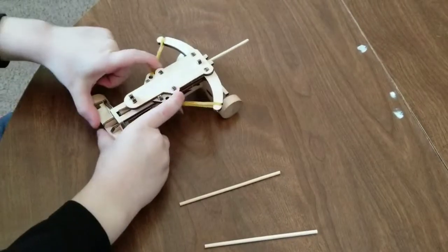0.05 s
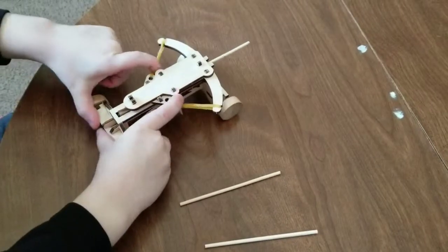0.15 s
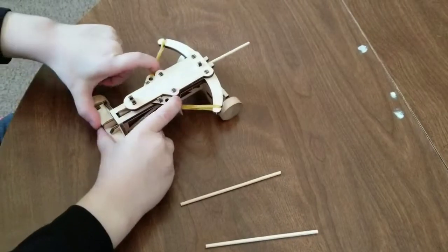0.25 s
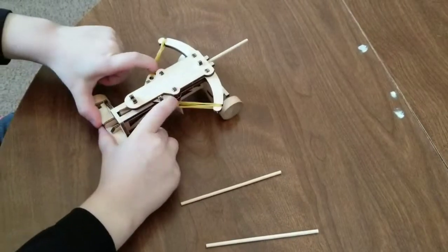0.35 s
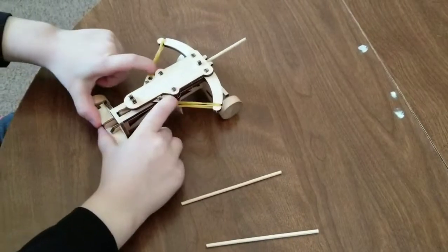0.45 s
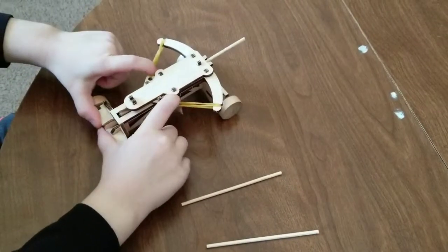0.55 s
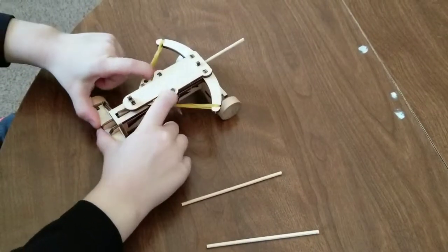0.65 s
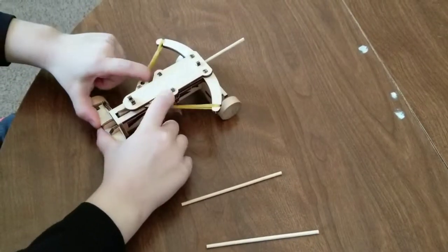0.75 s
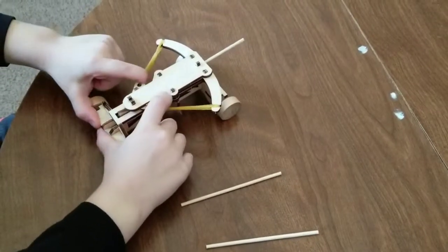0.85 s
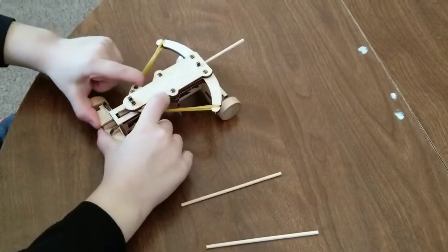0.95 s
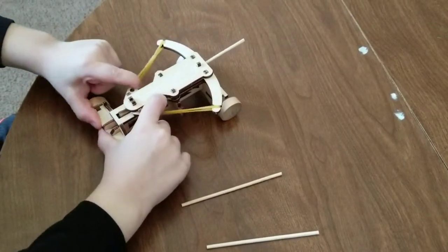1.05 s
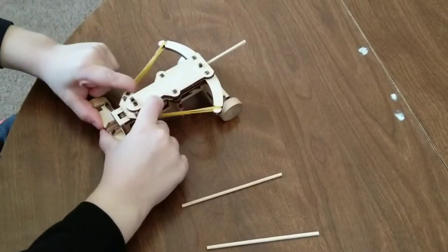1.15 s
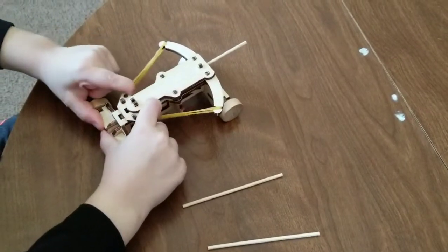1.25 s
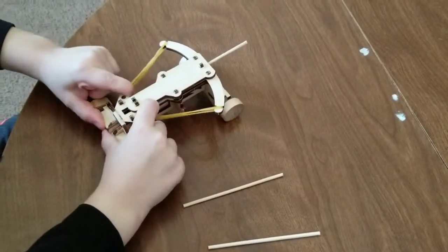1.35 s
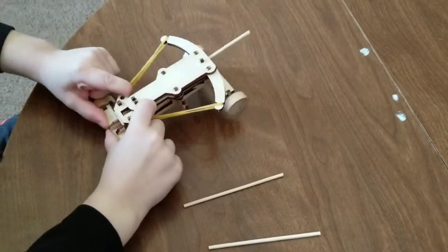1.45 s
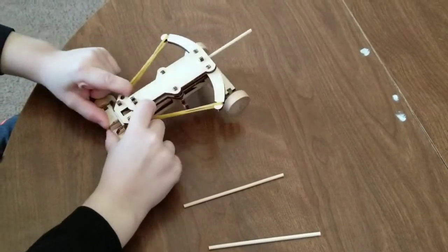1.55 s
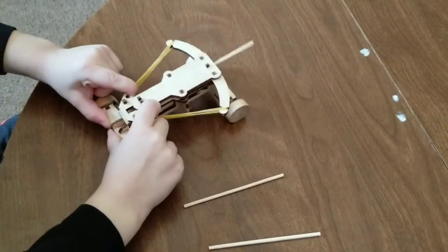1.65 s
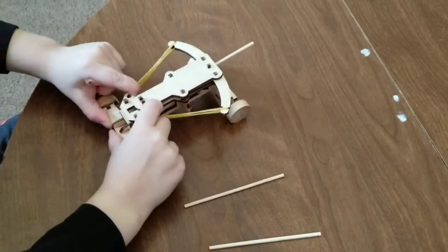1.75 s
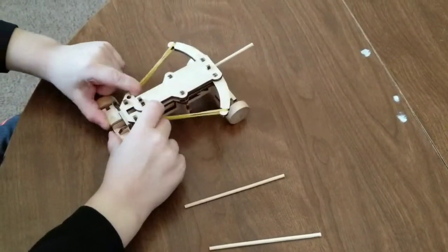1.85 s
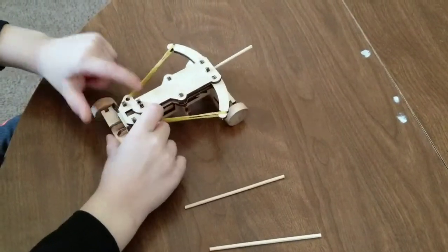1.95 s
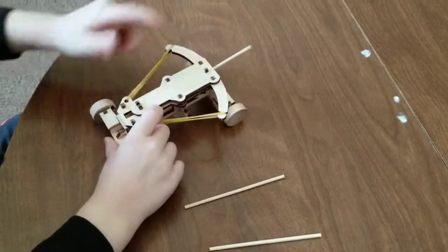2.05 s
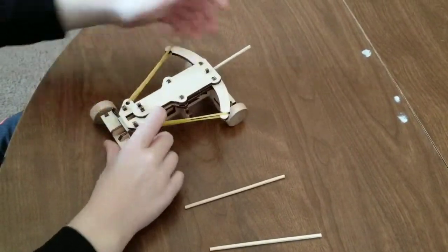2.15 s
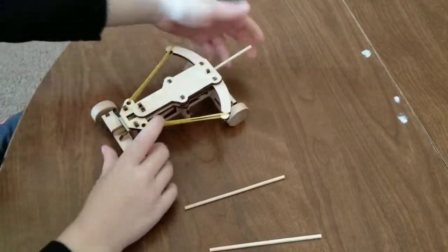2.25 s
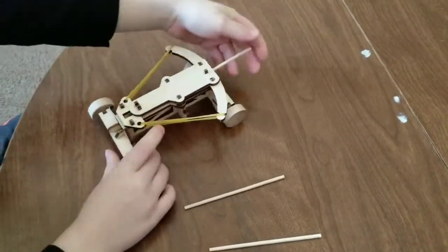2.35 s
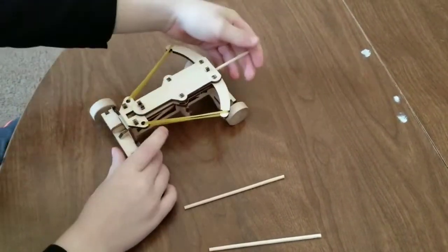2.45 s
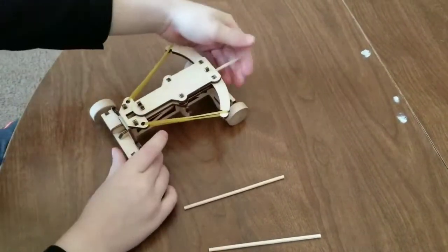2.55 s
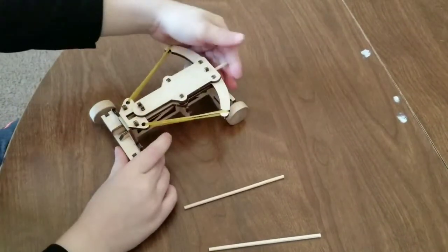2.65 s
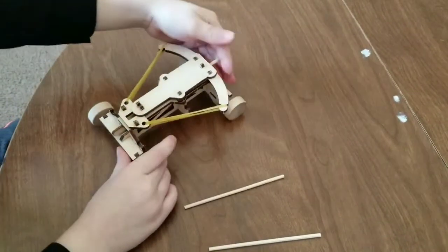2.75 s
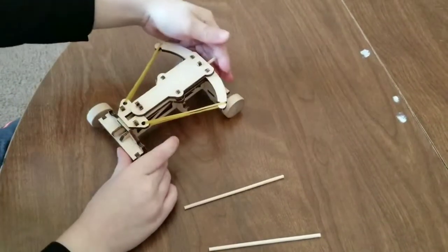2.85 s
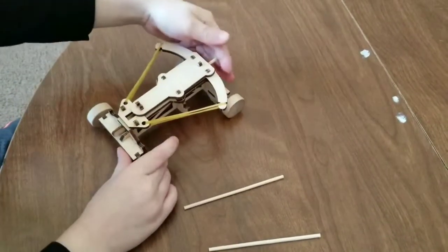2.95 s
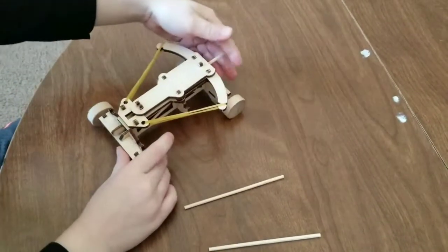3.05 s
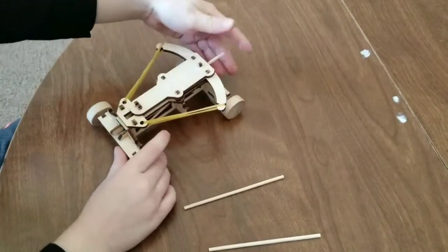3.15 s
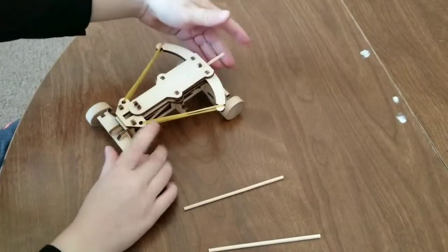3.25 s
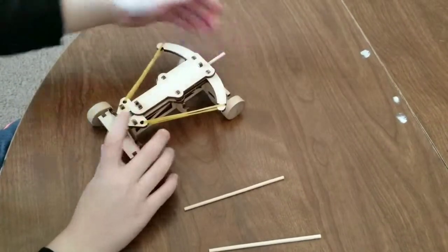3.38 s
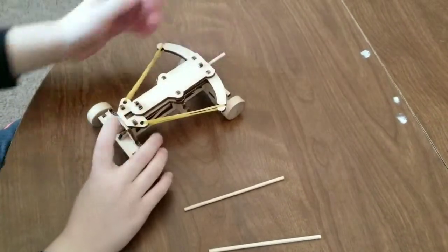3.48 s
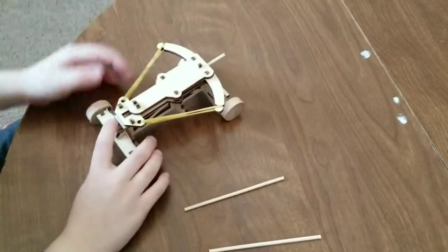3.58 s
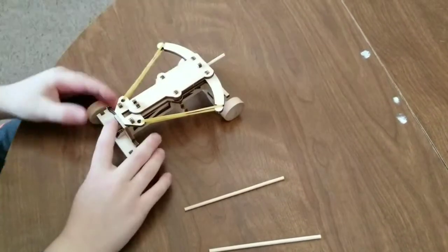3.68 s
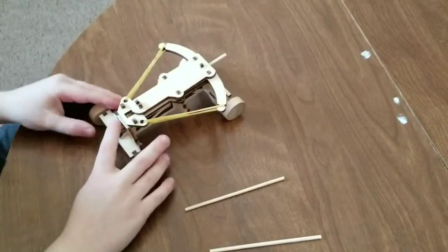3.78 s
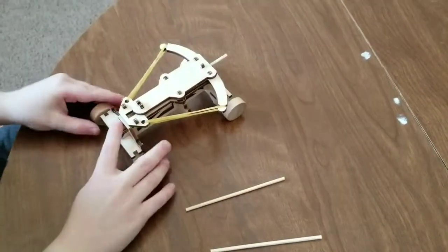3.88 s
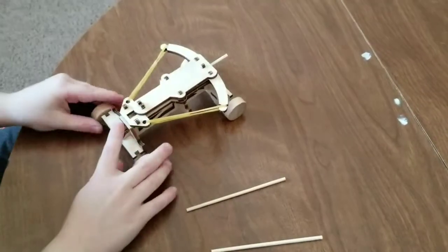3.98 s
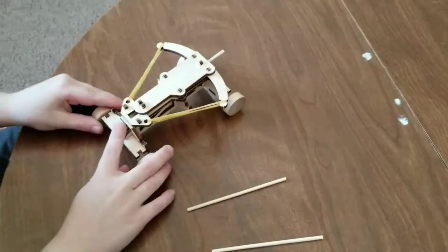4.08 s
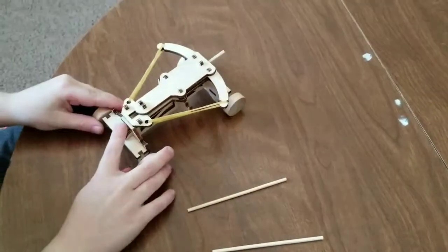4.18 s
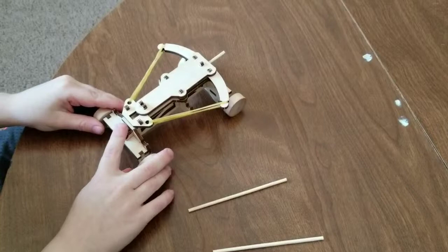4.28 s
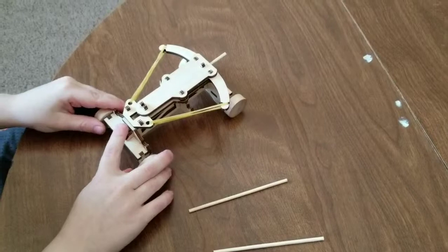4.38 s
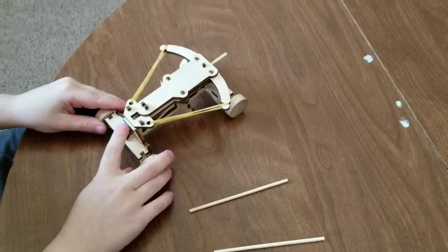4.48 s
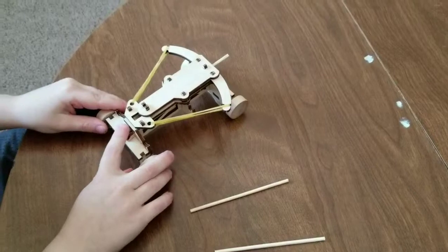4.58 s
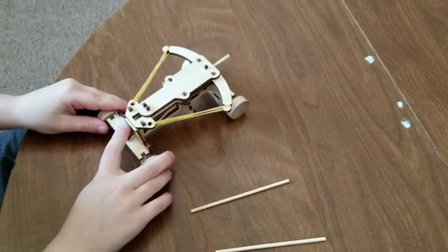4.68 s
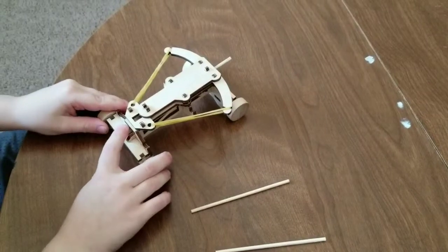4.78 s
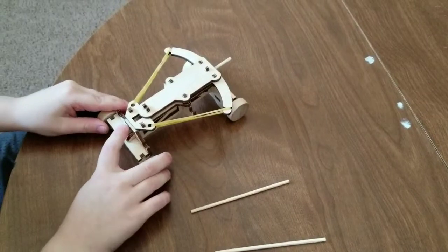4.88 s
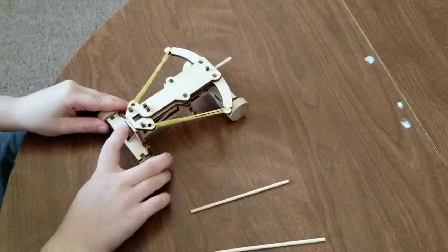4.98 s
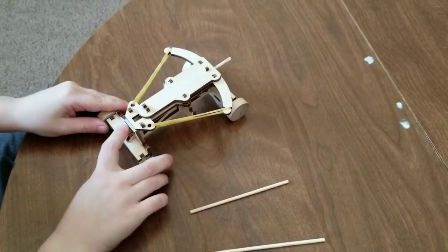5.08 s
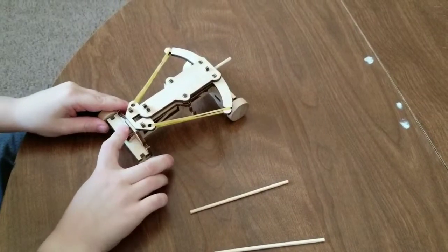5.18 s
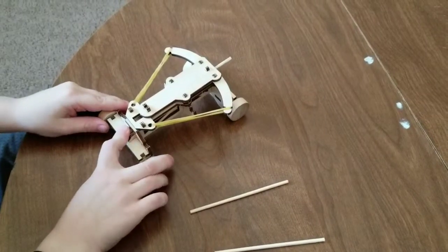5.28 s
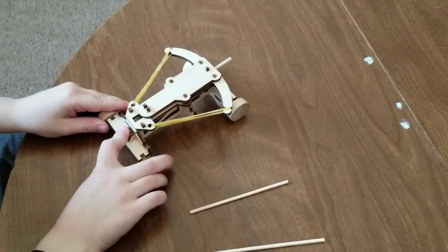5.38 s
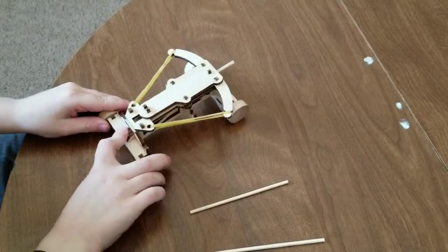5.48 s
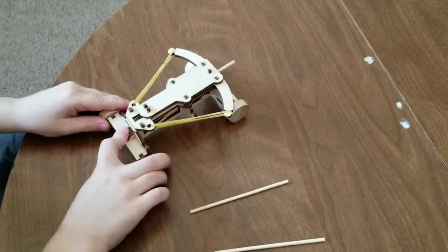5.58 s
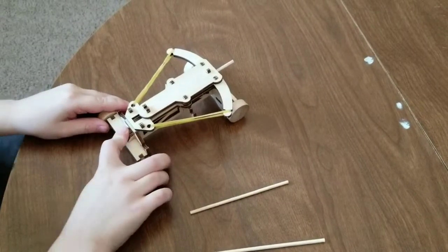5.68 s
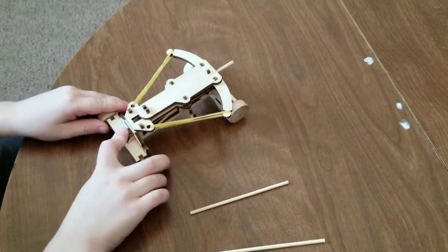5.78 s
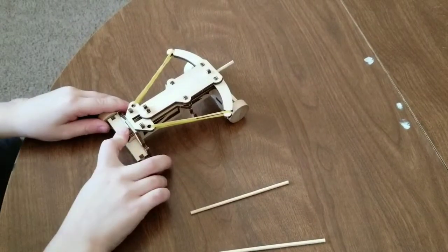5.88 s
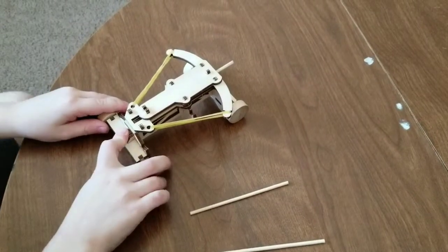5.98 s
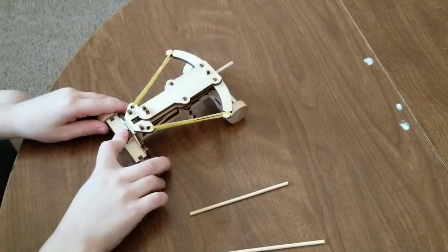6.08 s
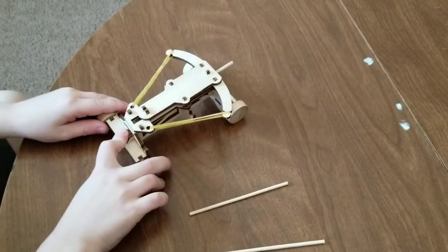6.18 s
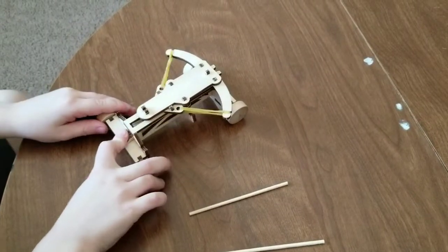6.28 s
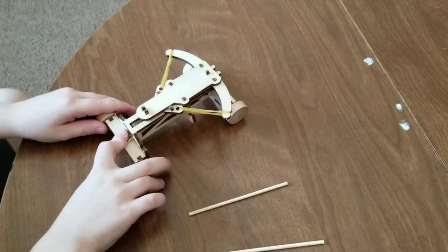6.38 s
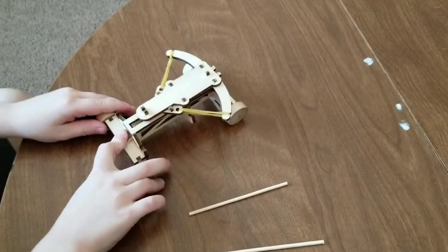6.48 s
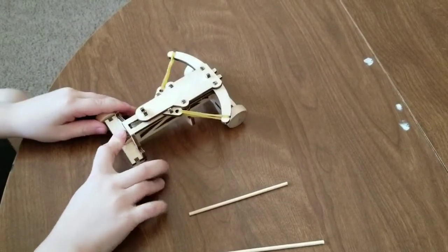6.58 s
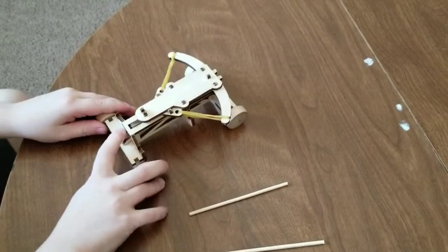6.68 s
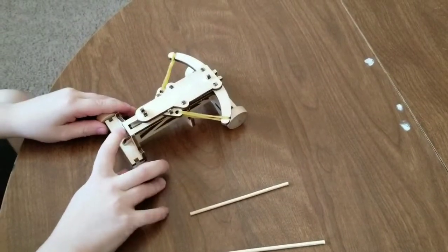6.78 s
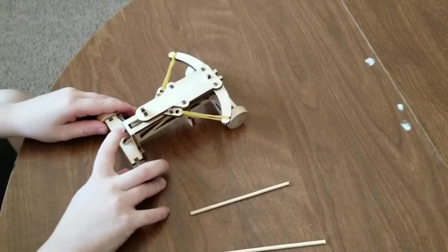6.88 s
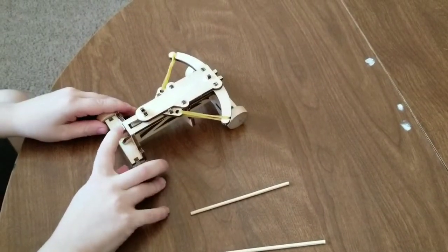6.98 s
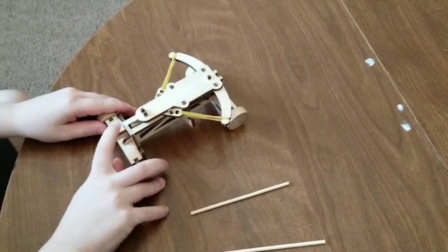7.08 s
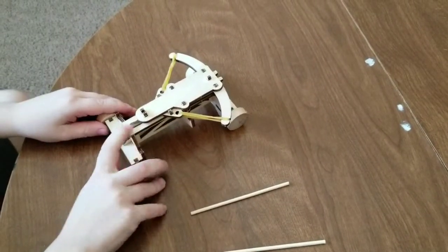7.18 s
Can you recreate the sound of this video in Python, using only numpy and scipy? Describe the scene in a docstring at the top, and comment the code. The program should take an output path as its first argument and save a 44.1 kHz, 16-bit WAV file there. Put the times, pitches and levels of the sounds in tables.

```python
"""Over a mains hum and low rumble in a quiet room, hands rub and click the parts of a small plywood catapult.
Its slider is drawn along the rail; a latch snaps and chatters on the taut band, and another snap follows.
Fainter clicks and scrapes of loading go on until the shot: the released slider rattles and puffs air.
Contacts and rubs ring damped wood modes, slides and rattle are coloured grains, the puff is a decaying tone.
The recorder turns its gain down after each loud snap; source levels stand ahead of that gain control."""
import sys
import numpy as np
from scipy import signal
from scipy.fft import rfft, irfft
from scipy.io import wavfile

SR = 44100
rng = np.random.default_rng(int(sys.argv[2]) if len(sys.argv) > 2 else 0)


def dump_mix(stems):
    """Bounce the given channels to the path in sys.argv[1] as a 16-bit WAV at rate SR."""
    frames = np.atleast_2d(stems).T  # one column per channel
    limited = np.clip(frames, -1, 1)  # hard clip at full scale
    pcm = np.round(limited * 32767).astype(np.int16)
    wavfile.write(sys.argv[1], SR, pcm)


N = 319284      # samples


def from_db(db):
    """Level is logarithmic: decibels to amplitude gain."""
    return 10 ** (np.asarray(db, float) / 20)


def rms_one(x):
    """Effective value: scale a signal to rms 1."""
    return x / np.sqrt(np.mean(x ** 2) + 1e-20)


def in_time(rows):
    """Envelope: interpolate the columns of a time table linearly, sample by sample."""
    s, *columns = np.transpose(rows)
    return [np.interp(np.arange(N) / SR, s, c) for c in columns]


def at_hz(points, hz):
    """Frequency response: read a table on a logarithmic frequency axis."""
    table_hz, values = np.transpose(points)
    return np.interp(np.log(np.maximum(hz, 1)), np.log(table_hz), values)


def coloured(x, spectrum):
    """Linear filtering: give white input a spectrum, then rms 1."""
    hz = np.fft.rfftfreq(x.shape[-1], 1 / SR)
    shaped = rfft(x) * from_db(at_hz(spectrum, hz))
    return rms_one(irfft(shaped, x.shape[-1]))


def stereo_noise(alike):
    """Partial coherence: two white noises whose correlation is alike."""
    mid, side = rng.standard_normal((2, N))
    alike = np.clip(alike, 0, 1)
    return np.sqrt(1 + alike) * mid + np.sqrt(1 - alike) * side * [[1], [-1]]


def grains(per_s, spread_db):
    """Shot noise: tiny random impacts of uneven size, heard differently on each side."""
    sizes = from_db(spread_db * np.minimum(rng.exponential(1, N), 4))
    struck = rng.random(N) < per_s / SR
    return sizes * struck * stereo_noise(alike=0.45)


def drift(rate):
    """Slow random modulation: straight lines between normal chance values, rate of them per second."""
    knots = np.arange(-2, N / SR * rate + 2)
    values = rng.standard_normal(4000)[:len(knots)]
    return np.interp(np.arange(N) / SR * rate, knots, values)


def rung(bright_hz, below_db, above_db, focus_db, damping, scatter_db):
    """Modal impulse response: decaying sines, weighted towards the brightest pitch, differ at each microphone."""
    # modes of the plywood frame on the table top: f/Hz, level/dB, t60/s at damping 1
    wood_modes = [(290, -1, 0.037), (324, 1, 0.04), (440, -5.5, 0.062), (620, -3.5, 0.035),
                  (770, -0.5, 0.02), (872, -1.5, 0.027), (980, -2.5, 0.013), (1290, -0.5, 0.024),
                  (1640, 0, 0.021), (1900, -1, 0.019), (2200, -4.5, 0.022), (2600, 1.5, 0.021),
                  (2990, -0.5, .02), (3490, 0.5, 0.022), (3910, 1.5, .02), (4370, -0.5, 0.047),
                  (4920, 1, 0.026), (5300, 0, 0.023), (5850, 1, 0.022), (6440, 6, 0.021),
                  (7362, -1.5, 0.013), (8200, -8, 0.0092), (9600, -14, 0.0088), (10300, -6.5, 0.011),
                  (11100, -4.5, .008), (12600, -8, 0.038), (13900, -8.5, 0.021)]
    t = np.arange(round(.15 * SR)) / SR
    hz, level_db, t60 = np.transpose(wood_modes)[:, :, None]
    chance = rng.standard_normal((5, len(wood_modes), 1))
    # weights fall by focus_db per octave, down to a shelf on either side
    shelf_db = np.where(hz < bright_hz, below_db, above_db)
    weight_db = np.maximum(-focus_db * np.abs(np.log2(hz / bright_hz)), shelf_db)
    sign = (-1) ** np.arange(len(wood_modes))[:, None]
    strength = sign * from_db(level_db + weight_db + scatter_db * chance[:2])
    hz = hz * (1 + .01 * scatter_db * chance[2])      # chance detunes each mode slightly at every contact
    # each mode radiates from another spot
    since = np.maximum(t - .00005 * scatter_db * np.abs(chance[3:]), 0)
    decay = from_db(-60 * since * damping / t60)
    return np.sum(strength * np.sin(2 * np.pi * hz * since) * decay, axis=1)


def add(out, s, sound):
    """Superposition: mix a sound in from time s."""
    i = round(s * SR)
    out[:, i:i + sound.shape[1]] += sound[:, :N - i]


def hum():
    """Mains hum at twice the line pitch with weak harmonics, wavering a little, over a low noise rumble."""
    # harmonics: f/Hz, mean level/dB rms
    harmonics = [(120, -47.5), (240, -73), (360, -79)]
    # relative spectrum of the rumble: f/Hz, density/dB
    rumble_colour = [(20, -12), (45, -11), (75, -0.5), (100, -2), (150, 1.5), (200, -6), (280, -9.5),
                     (400, -19), (650, -33), (1200, -48.5)]
    rumble_db = -60.5
    turn = 2 * np.pi * np.arange(N) / SR
    tone = 0
    for hz, db in harmonics:
        level = np.sqrt(2) * from_db(db + .7 * drift(5))
        tone = tone + level * np.sin(hz * turn + rng.uniform(0, 2 * np.pi))
    rumble = from_db(rumble_db + 2.8 * drift(14)) * coloured(stereo_noise(alike=.8), rumble_colour)
    return tone * from_db([[.3], [-.3]]) + rumble


def room(x):
    """Diffuse reverberation: each octave of noise dies at its own rate, independently on each side."""
    # decay time: f/Hz, t60/s
    decay_times = [(200, 0.45), (1000, 0.3), (3000, .33), (7000, .28), (14000, 0.2)]
    room_db, gap_s = -6, 0.0049      # tail level; time in which the echoes build up
    t = np.arange(round(.6 * SR)) / SR
    tail = 0
    for low in 100 * 2.0 ** np.arange(7.5):
        sos = signal.butter(2, [low, min(2 * low, 19000)], "band", fs=SR, output="sos")
        noise = signal.sosfilt(sos, rng.standard_normal((2, len(t))))
        tail = tail + noise * from_db(-60 * t / at_hz(decay_times, low * np.sqrt(2)))
    tail = tail * (1 - np.exp(-(t / gap_s) ** 2))
    tail = tail / np.sqrt(np.sum(tail ** 2, axis=1, keepdims=True))
    mono = x.mean(axis=0, keepdims=True)
    return from_db(room_db) * signal.fftconvolve(mono, tail, axes=1)[:, :N]


def pulls():
    """Amplitude envelope: each pull swells in, drifts from its first to its last level and fades."""
    # the slider on its rail in short pulls: t/s, length/s, first level/dB, last level/dB
    draws = [(0.831, .12, -59.5, -61), (.95, .335, -72.5, -63), (1.35, .11, -54.5, -63.5),
             (1.5, .155, -68, -64)]
    attack_s, release_s = .025, .025
    s, gain = np.arange(N) / SR, 0
    for start, length, first_db, last_db in draws:
        end = start + length
        edges = np.clip(np.minimum((s - start) / attack_s, 1 + (end - s) / release_s), 0, 1)
        level_db = np.interp(s, [start, end], [first_db, last_db])
        gain = np.maximum(gain, edges * from_db(level_db))
    return gain


def rubbing():
    """Stick-slip friction: dense grains ring the wood while a part drags; the slider hisses."""
    # parts dragged over each other or the table: t/s, length/s, level/dB,
    # brightest pitch f/Hz, lowest weight of the modes above it/dB
    scrapes = [(0.174, 0.12, -66, 1290, -12), (0.276, 0.067, -59.5, 1640, -11),
               (0.511, 0.091, -69.5, 1900, -9), (0.527, 0.077, -59.5, 353, -31),
               (0.69, 0.056, -75, 2600, -10), (1.277, 0.045, -68, 1640, -22),
               (1.347, 0.054, -58, 1290, -30), (1.595, 0.046, -61.5, 620, -17),
               (1.666, 0.05, -29.5, 10300, 6), (1.906, 0.051, -25.5, 2990, -21),
               (2.299, 0.078, -74.5, 980, -28.5), (2.354, 0.078, -69, 5040, -7.5),
               (2.52, 0.13, -55, 770, -22), (2.602, 0.05, -56, 1290, -19), (2.683, 0.079, -64, 6480, -13.5),
               (2.798, 0.064, -64, 4800, -1), (2.865, 0.052, -55.5, 2600, -16),
               (2.942, 0.12, -57.5, 1290, -18.5), (3.192, 0.065, -75, 980, -20),
               (3.3, 0.12, -76.5, 6370, -5.5), (3.766, 0.12, -66.5, 770, -20.5),
               (3.797, 0.075, -70.5, 1630, -28), (3.866, 0.064, -74.5, 5840, -0.5),
               (3.926, 0.096, -70, 980, -14.5), (4.104, 0.042, -74, 3990, -4.5),
               (4.221, 0.1, -63, 1290, -17.5), (4.277, 0.083, -68, 990, -25), (4.98, .05, -75.5, 620, -10),
               (5.374, 0.049, -71.5, 1290, -8), (5.673, 0.094, -60, 980, -22),
               (6.257, 0.023, -63, 440, -26.5), (6.268, 0.18, -76, 2200, -3), (6.659, 0.073, -54, 874, -30),
               (6.966, 0.036, -51, 290, -35)]
    # relative spectrum of the sliding hiss: f/Hz, density/dB
    slide_colour = [(1180, -49.5), (2000, -22), (2790, -16.5), (3940, -0.5), (6090, -2), (8080, -13),
                    (8730, -18.5), (13900, -9), (14900, -20.5), (15200, -71)]
    hard_db = -42      # louder scrapes are slams
    # lowest weight of modes under the brightest pitch: a rub at 1000 Hz, its loss per octave up; a slam
    rub_bass_db, rub_bass_loss_db, slam_bass_db = -9, 6, -4
    out, slips = np.zeros((2, N)), grains(6800, spread_db=4.5) * from_db(2.6 * drift(60))
    for s, length, db, hz, above_db in scrapes:
        t = np.arange(round(length * SR)) / SR
        stroke = np.clip(np.minimum(t / (0.09 * length), (length - t) / .025), 0, 1)
        force = slips[:, round(s * SR):][:, :len(t)] * stroke
        if db > hard_db:      # parts slammed together damp each other and ring broader
            pressed, below_db = 2.5, slam_bass_db
        else:
            pressed, below_db = 1.4, rub_bass_db - rub_bass_loss_db * np.log2(hz / 1000)
        wood = rung(hz, below_db, above_db, focus_db=14.5, damping=0.76 * pressed, scatter_db=2.2)
        wood = wood / np.sqrt(np.sum(wood ** 2) / 2)
        add(out, s, from_db(db) * signal.fftconvolve(rms_one(force), wood, axes=1))
    hiss = coloured(grains(12000, spread_db=-0.5), slide_colour)
    return out + pulls() * hiss * from_db(2.3 * drift(52))


def blow(peak_db, bright_hz, below_db, above_db, pan_db, focus_db, rough_s, damping, scatter_db):
    """Impact excitation: a sharp push and a short rough crackle drive damped wood."""
    t = np.arange(400) / SR
    force = .5 * rng.standard_normal((1, len(t))) * np.exp(-t / rough_s)
    force[0, 0] = 1
    wood = rung(bright_hz, below_db, above_db, focus_db, damping, scatter_db)
    sound = signal.fftconvolve(wood, force, axes=1)
    # small parts radiate little bass
    sound = signal.sosfilt(signal.butter(2, 614, "high", fs=SR, output="sos"), sound)
    sound = sound / np.abs(sound).max(axis=1, keepdims=True)
    return sound * from_db(peak_db + np.array([[.5], [-.5]]) * pan_db)


def clicks():
    """Impact: single contacts of wood on wood."""
    # t/s, peak level (mean of both sides)/dB, brightest pitch f/Hz,
    # lowest weight of the modes above it/dB, left minus right level/dB
    contacts = [(0.284, -39, 1640, -18, -9.5), (0.522, -53, 2040, -7, 1), (0.544, -45.5, 2040, -1, 2),
                (0.607, -50, 4400, -25, -11), (0.695, -46, 4070, -3, -6), (1.288, -51, 4430, -18, 1),
                (1.351, -30, 5740, -8, -9), (1.38, -36.5, 3840, -11, -5), (1.661, -4, 4030, -1, -4.5),
                (1.905, -1, 4420, -12.5, -8), (1.908, -4.5, 2990, -28, 2.5), (2.597, -43, 2200, -24, 4),
                (2.616, -38, 990, -20.5, 5), (2.867, -26.5, 6490, -23, -9), (2.884, -35.5, 3170, -16.5, -4),
                (2.965, -38.5, 1238, -21.5, 0.5), (4.219, -51, 1295, -22.5, 4),
                (5.379, -56, 4050, -17.5, -3), (5.678, -51.5, 1360, -17, -3.5),
                (5.723, -49.5, 1290, -18, -4.5), (6.464, -15.5, 6170, -16, 1), (6.468, -4, 12600, -8, -3.5),
                (6.479, -15, 12400, -18, -14), (6.499, -5, 2500, -8.5, -12)]
    out = np.zeros((2, N))
    for s, peak_db, hz, above_db, pan_db in contacts:
        add(out, s, blow(peak_db, hz, -19, above_db, pan_db,
                         focus_db=17.5, rough_s=0.001, damping=2.0, scatter_db=3.5))
    return out


def chatter():
    """Repeated impact: the latch bounces at the pitch of the band, ever softer and duller.

    Two close modes beat in each touch."""
    # start t/s, touches per second, settled peak level/dB, fall per touch/dB,
    # extra level at first/dB, brightest pitch f/Hz
    bounces = (1.6703, 84.9, -15, 2.2, 5, 3690)
    out = np.zeros((2, N))
    start, per_s, settled_db, fall_db, extra_db, hz = bounces
    for k in range(18):
        peak_db = settled_db - k * fall_db + extra_db * np.exp(-k / 2)
        touch = blow(peak_db, hz, -26, -14 - 4 * k, -3,
                     focus_db=60, rough_s=.0001, damping=1.2, scatter_db=.4)
        add(out, start + k / per_s, touch)
    return out


def shot():
    """Shot noise and air pulse: a dense rattle, louder on the right, and a puff that comes to the left first."""
    # the released slider rattles forward: t/s, mean level/dB
    rattle_levels = [(6.464, -50.5), (6.467, -32), (6.476, -32.5), (6.479, -15), (6.495, -17), (6.503, -12),
                     (6.52, -16), (6.55, -21), (6.6, -34.5), (6.7, -60)]
    # relative spectrum of the rattle: f/Hz, density/dB
    rattle_colour = [(88, -52.5), (150, -8), (448, -9.5), (716, -41), (837, -19), (979, -17.5),
                     (2400, -4.5), (4800, -1), (8500, -7.5), (12400, -4), (14600, -12), (16000, -114)]
    # air push and slow pull, a row for each microphone:
    # push level/dB, f/Hz, t60/s, pull level/dB, pull t60/s
    puff_rows = [(-8, 115, 0.031, -30.5, 0.026), (-16, 100, 0.044, -18, .09)]
    # arrival of the puff at each microphone: t/s
    arrivals = (6.4675, 6.469)
    s = np.arange(N) / SR
    moving = (s > rattle_levels[0][0]) & (s < rattle_levels[-1][0])
    rattle_db = in_time(rattle_levels)[0] + 2.5 * drift(300)
    rattle = coloured(grains(20000, spread_db=-2.0), rattle_colour) * from_db(rattle_db)
    push_db, hz, t60, pull_db, pull_t60 = np.transpose(puff_rows)[:, :, None]
    t = np.maximum(s - np.array(arrivals)[:, None], 0)
    push = from_db(push_db - 60 * t / t60) * np.sin(2 * np.pi * hz * t) * (1 - np.exp(-t / 0.0013))
    pull = from_db(pull_db - 60 * t / pull_t60) * (1 - np.exp(-(t / 0.0039) ** 2))
    return rattle * moving * from_db([[-1.5], [1.5]]), push - pull


def scene():
    """Superposition of the catapult on the table, its echoes and the hum."""
    rattle, puff = shot()
    catapult, latch = clicks() + rubbing() + rattle, chatter()
    # the chatter is aimed at the microphones more than at the walls
    echoes = room(catapult + from_db(-12) * latch)
    return catapult + latch + echoes + puff + hum()


def gain_control(x, memory_s, start_db, slope, fast_s, slow_s, slow_share, hold_s, rise_db_per_s):
    """Dynamic compression: loud sound cuts the gain, partly fast, partly slowly; it holds, then climbs steadily."""
    step = 128
    dt = step / SR
    power = np.mean(x[:, :N // step * step].reshape(2, -1, step) ** 2, axis=(0, 2))
    keep = np.exp(-dt / memory_s)
    level_db = 10 * np.log10(signal.lfilter([1 - keep], [1, -keep], power) + 1e-12)
    wanted = slope * np.maximum(level_db - start_db, 0)
    held, age, fast, slow, cut = 0., 0., 0., 0., []
    for want in wanted:
        held, age = (want, 0.) if want >= held else (held, age + dt)
        if age > hold_s:
            held = max(want, min(held, cut[-1]) - rise_db_per_s * dt)
            fast, slow = min(fast, held), min(slow, held)
        fast += (held - fast) * min(dt / fast_s, 1)
        slow += (held - slow) * min(dt / slow_s, 1)
        cut.append((1 - slow_share) * fast + slow_share * slow)
    return x * from_db(-np.interp(np.arange(N) / step, np.arange(len(cut)) + 1, cut))


def band_limit(x):
    """A steep low-pass at the top of the band."""
    return signal.sosfilt(signal.butter(12, 16820, fs=SR, output="sos"), x)


def record(dry):
    """Signal chain: the microphone's top end, gain control, the recorder's own hiss and a hard ceiling."""
    # the hiss dips and returns: t/s, level/dB rms
    hiss_levels = [(0, -75), (1.9, -73.5), (2.1, -88.5), (2.5, -83.5), (2.8, -81.5), (3.3, -75.5),
                   (7.24, -74)]
    # relative spectrum of the hiss: f/Hz, density/dB
    hiss_colour = [(290, -31.5), (500, -5), (839, -9.5), (1030, -9.5), (2290, -12), (2800, -14),
                   (13200, -15.5), (14600, -12.5), (15100, -60)]
    mic_top_hz, ceiling = 15000, .95
    dry = signal.sosfilt(signal.butter(8, mic_top_hz, fs=SR, output="sos"), dry)
    x = gain_control(dry, memory_s=0.42, start_db=-37, slope=0.93, fast_s=0.021, slow_s=0.37,
                     slow_share=0.17, hold_s=0.84, rise_db_per_s=17.5)
    hiss = from_db(in_time(hiss_levels)[0]) * coloured(rng.standard_normal((2, N)), hiss_colour)
    mix = np.clip(x + hiss, -ceiling, ceiling)
    return band_limit(mix)


dry = scene()
out = record(dry)
dump_mix(out)
```